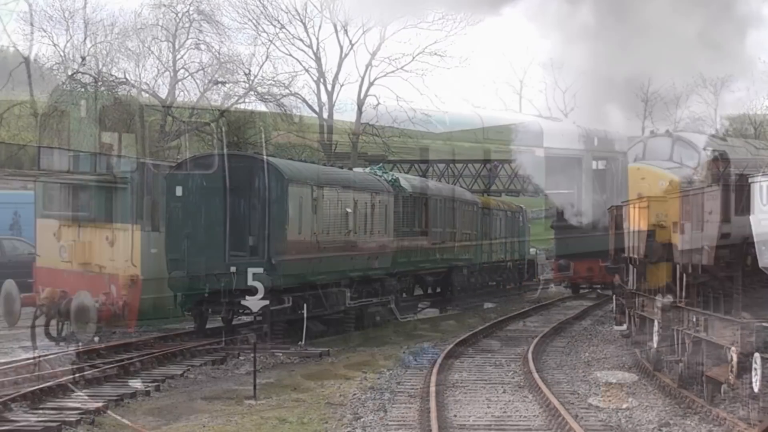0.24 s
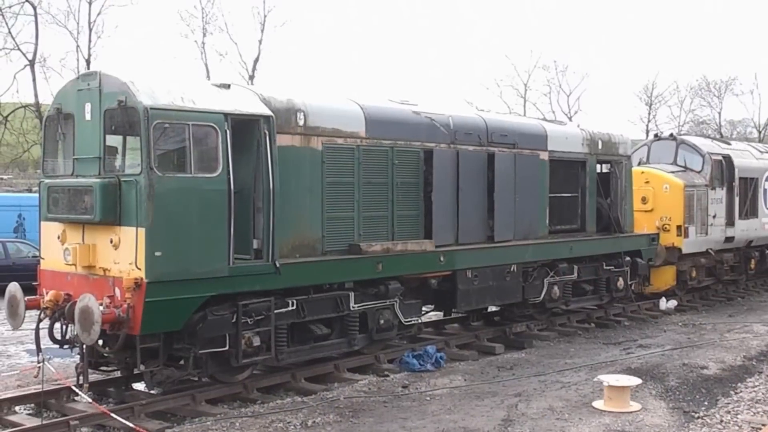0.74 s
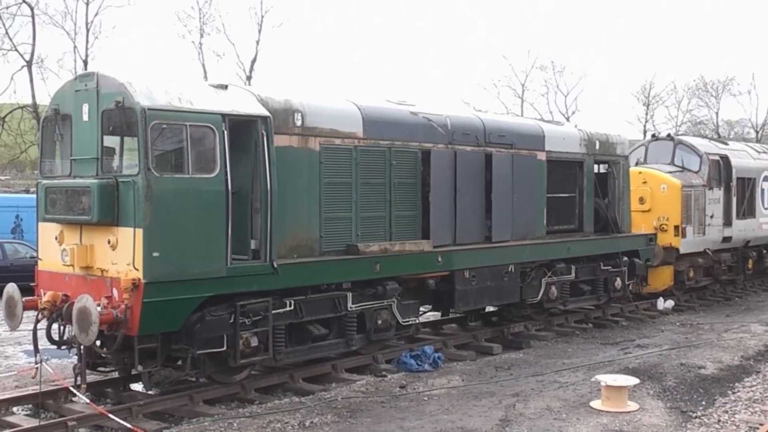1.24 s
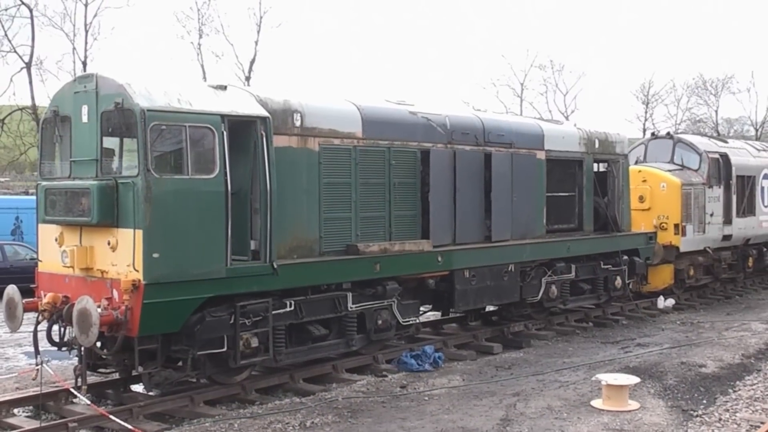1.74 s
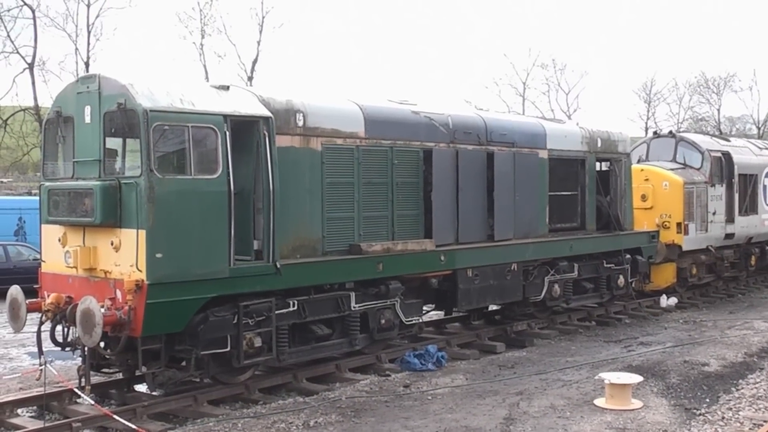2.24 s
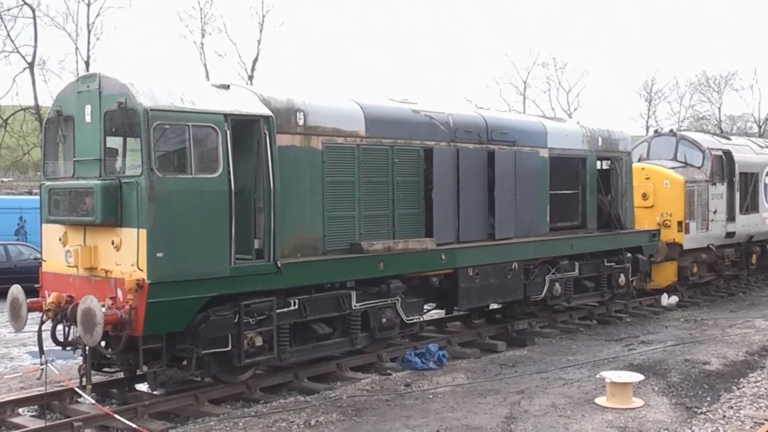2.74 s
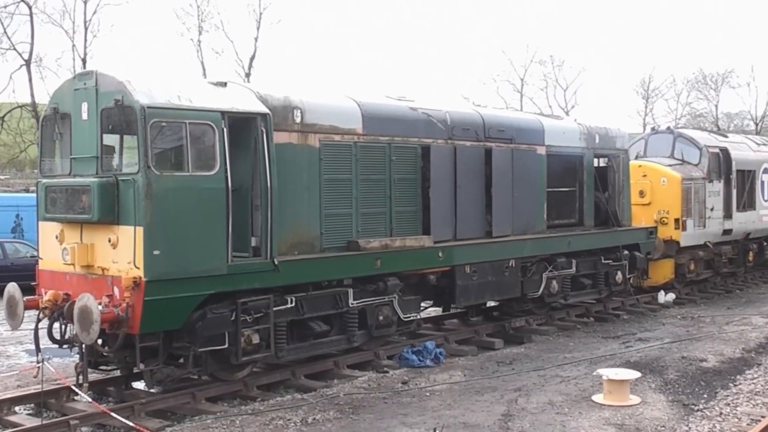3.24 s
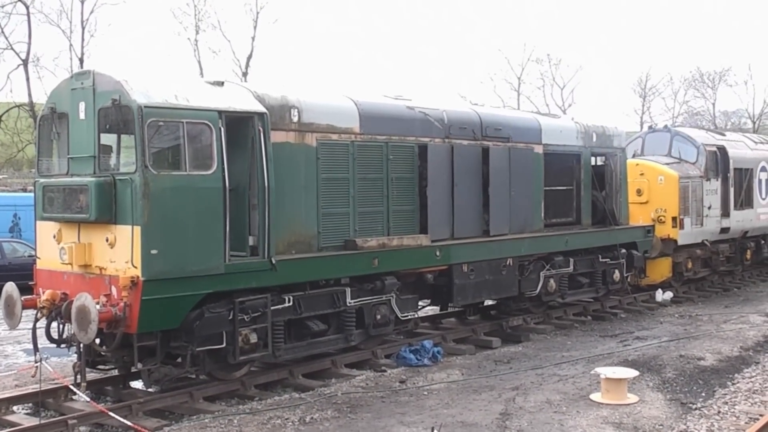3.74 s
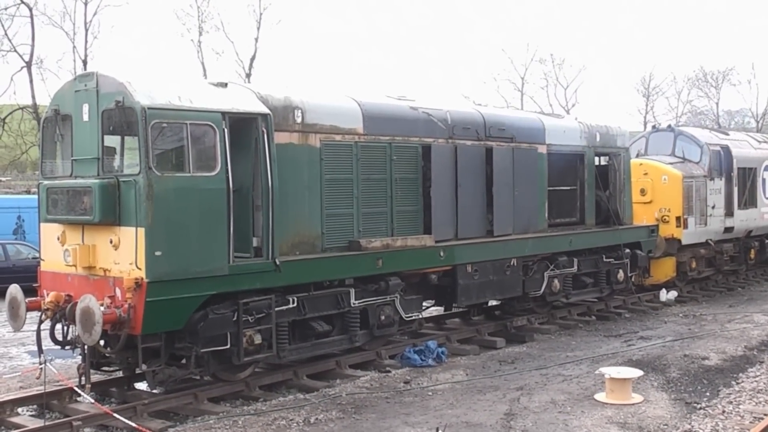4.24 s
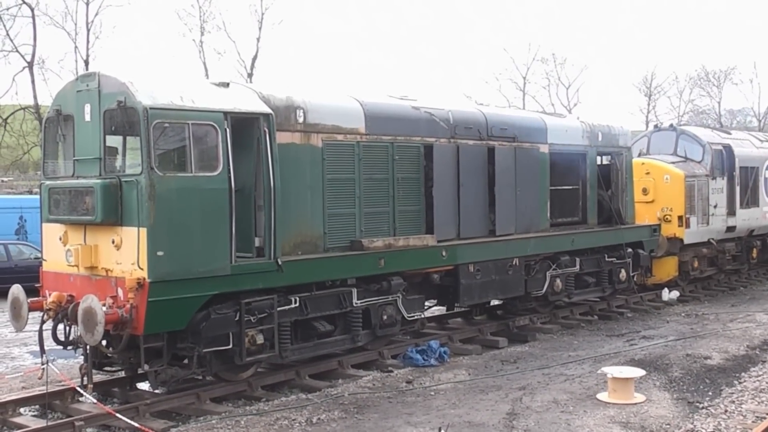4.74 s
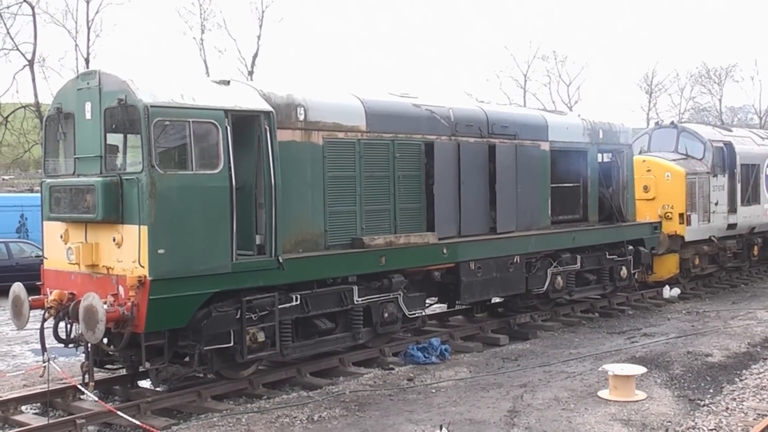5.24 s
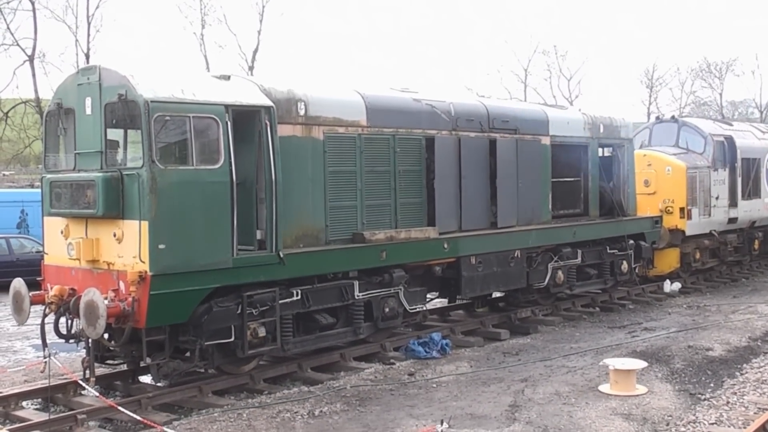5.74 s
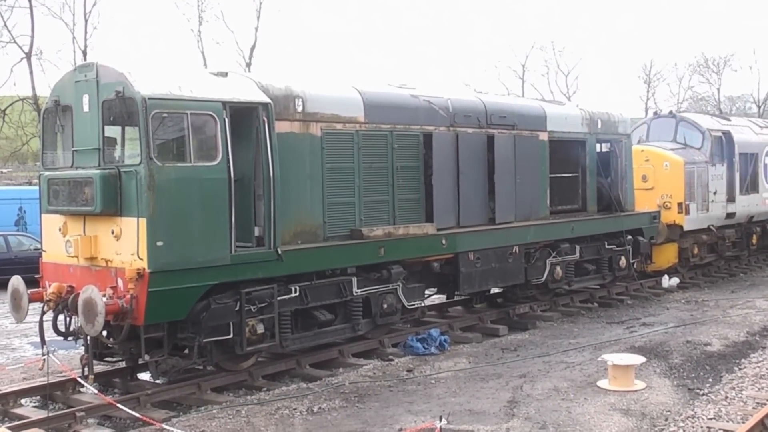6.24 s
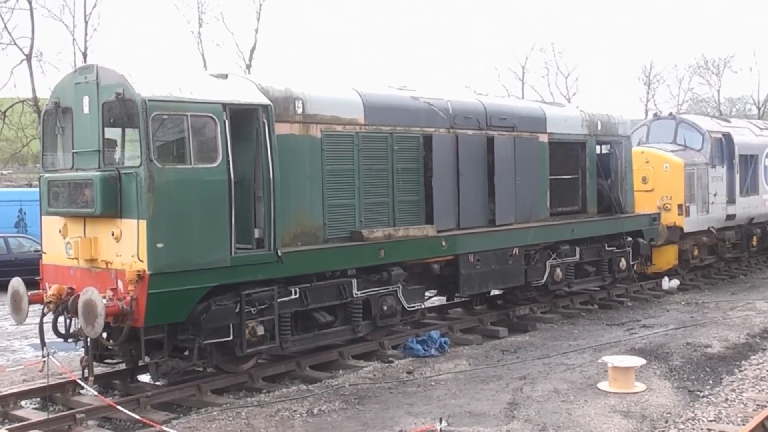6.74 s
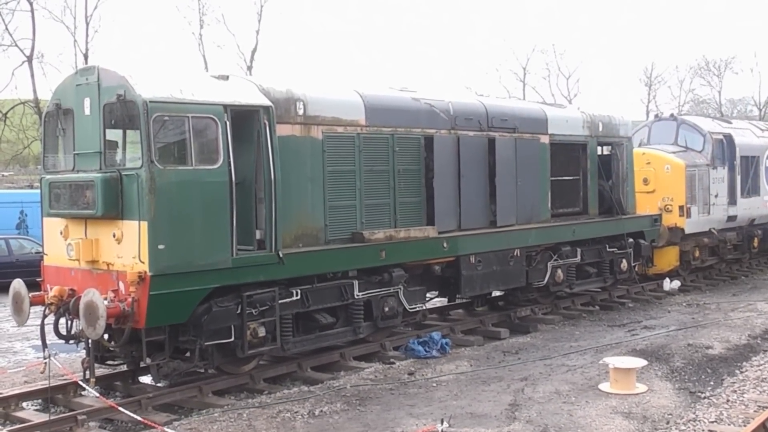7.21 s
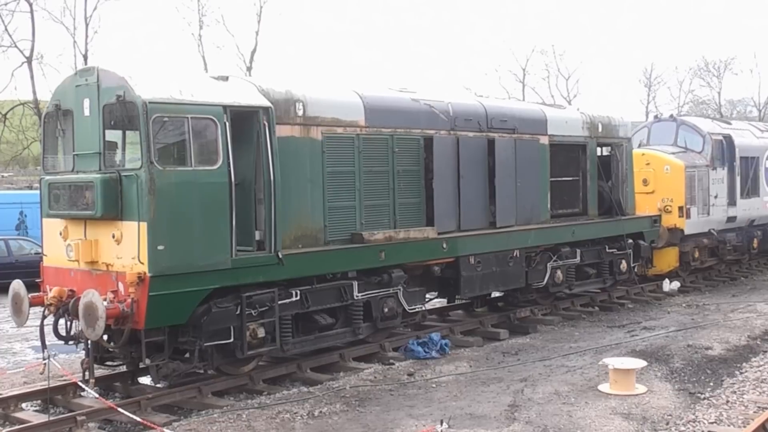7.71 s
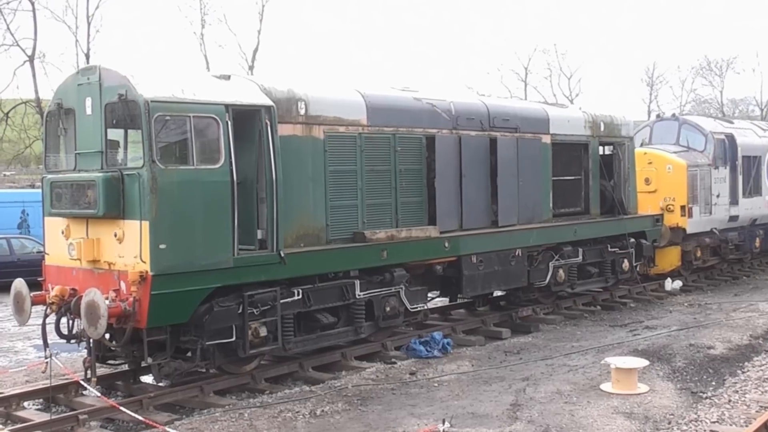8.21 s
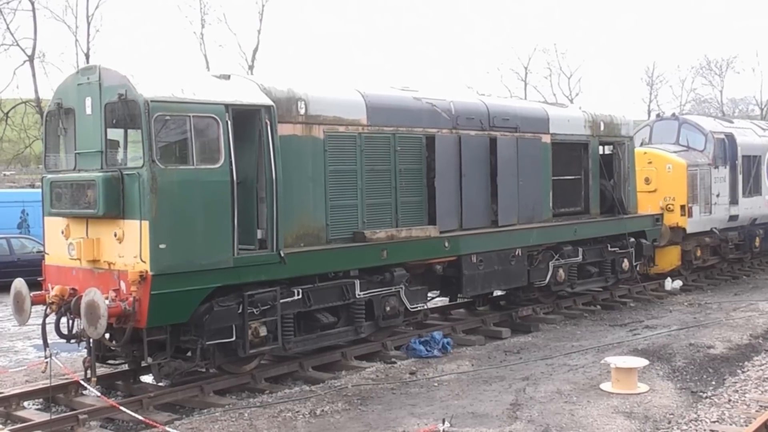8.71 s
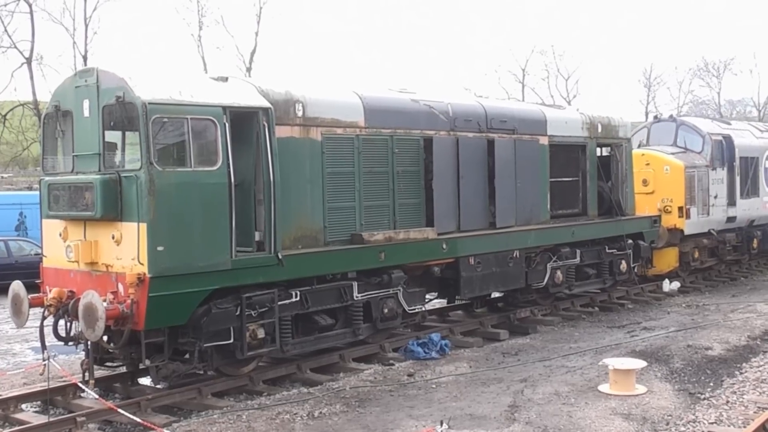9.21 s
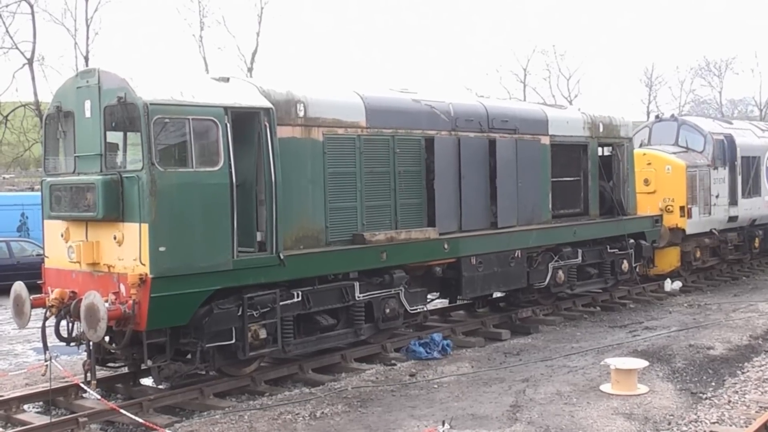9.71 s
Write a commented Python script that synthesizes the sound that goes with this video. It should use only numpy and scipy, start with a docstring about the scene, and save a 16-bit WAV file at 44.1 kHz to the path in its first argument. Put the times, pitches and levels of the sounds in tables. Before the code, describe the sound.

Outdoors in a railway yard, in stereo. At 0 s a broad, slightly lumpy roar of escaping steam is heard; between about 0.2 and 0.6 s it crossfades into a stationary diesel locomotive idling nearby. The engine gives a rough low rumble with a ringing casing, exhaust beats and a light knock about four times a second, over steady gear hum and bright airy hiss. On top is a piercing dry squeal near 3 kHz, broken into nearly fifty tiny chirps a second, with a hoarser whistle just below and scratchy overtones. At first it swells about eight times a second; from roughly 1.4 to 3 s the engine labours, slows very slightly, and the squeal becomes stronger and more even. From 3 to 10 s everything continues steadily, the squeal fluttering and drifting slightly between sides, faintly echoed by wagons and ground, without ending.

```python
"""Railway sounds in stereo: steam roars at the start, then the scene changes, dissolving within about half a
second into a yard with an idling diesel locomotive. Steam, combustion and air are coloured noise; the gears are
steady tones; exhaust beats and a knock follow the crank. Something dry on the diesel, a belt or a bearing,
squeals: one tone in chirps that come round with every engine cycle. From the second second the engine takes up
a load and slows a little; wagons and ground answer the squeal faintly."""
import sys
import numpy as np
from scipy.fft import rfft, irfft, next_fast_len
from scipy.io import wavfile
from scipy.ndimage import map_coordinates

SR = 44100
rng = np.random.default_rng(int(sys.argv[2]) if len(sys.argv) > 2 else 0)


def file_out(sig):
    """Save sig as 16-bit WAV at sys.argv[1]."""
    # one column per channel
    cols = np.atleast_2d(sig).T
    # limit, then scale
    lim = np.clip(cols, -1, 1)
    pcm = np.round(lim * 32767).astype(np.int16)
    wavfile.write(sys.argv[1], SR, pcm)


N = 439677

IDLE_RATE = 3.905  # reference idle speed, four-stroke cycles a second


def amp(db):
    """Decibels to gain."""
    return 10 ** (np.asarray(db) / 20)


def unit(x):
    """Scale so that the mean of the channels has rms 1."""
    return x / np.sqrt(np.mean(np.atleast_2d(x).mean(0) ** 2) + 1e-20)


def along(points, hz):
    """Read a curve of (Hz, value) points on a log frequency axis."""
    f, v = np.transpose(points)
    return np.interp(np.log(hz + 1), np.log(f + 1), v)


def curves(rows):
    """One value per sample for each column after the time in seconds."""
    s, *columns = np.transpose(rows)
    return [np.interp(np.arange(N) / SR, s, column) for column in columns]


def wobble(rate):
    """A smooth random curve through normal draws, rate knots a second."""
    knots = rng.standard_normal(int(N * rate / SR) + 4)
    return map_coordinates(knots, [np.arange(N) * rate / SR])


def ramp(start_s, length_s):
    """A straight rise from 0 to 1."""
    return np.clip((np.arange(N) / SR - start_s) / length_s, 0, 1)


def filtered(x, response):
    """Multiply the spectrum of x by a complex response of frequency."""
    m = next_fast_len(N + SR // 2)
    hz = np.fft.rfftfreq(m, 1 / SR)
    return irfft(rfft(x, m) * response(hz), m)[..., :N]


def resonance(hz, centre_hz, width_hz):
    """Response of one damped mode."""
    return 1j * hz * width_hz / (centre_hz ** 2 - hz ** 2 + 1j * hz * width_hz)


def ports(lean_db, lead):
    """Left and right gains for a level difference in dB and a phase lead of the left in radians."""
    left = amp(lean_db / 2) * np.exp(.5j * lead)
    right = amp(-lean_db / 2) * np.exp(-.5j * lead)
    return np.array([left, right])


def rush(colour):
    """Noise of rms 1 with the given response, as two microphones get it: partly alike, offset in level and phase."""
    # Each row: frequency in Hz, left-right likeness (1 is identical).
    likeness = [(60, 0.99), (120, 1), (240, 1), (480, 0.98), (950, 0.92), (1890, 0.73), (3770, 0.59),
                (7520, 0.68), (15000, 0.58)]
    # Each row: frequency in Hz, left minus right in dB.
    lean_db = [(60, 3), (110, -4), (200, -0.5), (380, -4), (700, -2.5), (1290, -3.5), (2380, -0.5),
               (4400, -3.5), (8120, -2.5), (15000, -3.5)]
    # Each row: frequency in Hz, radians by which the left leads.
    lead_rad = [(0, -0.5), (2670, -0.23), (5680, 0.85), (6630, -0.5), (8010, 1.5), (8530, -1.7), (9300, -1),
                (9730, -2), (10300, -1.6), (10900, -2), (12200, -1.7), (14200, -2), (14600, -1.6),
                (15200, -8.5)]

    def mid_and_side(hz):
        turn = np.arccos(np.clip(along(likeness, hz), 0, 1)) / 2
        return colour(hz) * np.array([np.cos(turn), np.sin(turn)])

    mid, side = filtered(rng.standard_normal((2, N)), mid_and_side)
    pair = np.array([mid + side, mid - side])
    return unit(filtered(pair, lambda hz: ports(along(lean_db, hz), along(lead_rad, hz))))


def diffuse(phase, wet_db, spread_hz):
    """Countless echoes off wagons and ground blur a tone into a narrow band, different at each ear."""
    blur = np.array([wobble(spread_hz) + 1j * wobble(spread_hz) for ear in range(2)])
    return amp(wet_db) * blur * np.exp(1j * phase) / np.sqrt(2)


def since(crank, place):
    """Seconds, at idle speed, from the nearest passage of a place in the engine cycle."""
    return ((crank - place + .5) % 1 - .5) / IDLE_RATE


def burst(crank, place, half_s):
    """A bell-shaped envelope at one place of every cycle; half_s is its standard deviation."""
    return np.exp(-.5 * (since(crank, place) / half_s) ** 2)


def swells(crank, rows, half_s, scatter_db):
    """Envelope of bursts that return every cycle, never quite equally strong."""
    bursts = sum(amp(db) * burst(crank, place, half_s) for place, db in rows)
    return bursts * amp(scatter_db * wobble(8))


def ripple(crank, place, order):
    """A swing that comes order times a cycle, with a crest at the given place."""
    return np.cos(2 * np.pi * order * (crank - place))


def strain(load):
    """The engine labours most halfway through taking up the load."""
    return np.sin(np.pi * load)


def steam_engine():
    """The broad, slightly lumpy roar of escaping steam, its lean to the right partly evened out."""
    # Spectrum of the steam. Each row: frequency in Hz, relative level in dB.
    steam_curve = [(18, -58), (30, -45), (81, -6.5), (171, -7), (328, -3), (485, -8.5), (662, -7),
                   (1140, -16), (1970, -17), (2840, -27.5), (3410, -30), (5030, -32), (15000, -54)]
    roar = rush(lambda hz: amp(along(steam_curve, hz)))
    return amp(-15.0 + 0.76 * wobble(10.0)) * roar * amp([[1], [-1]])


def rushing_air(load):
    """Air hisses as bright noise, with a bounce off a nearby surface rippling its spectrum."""
    # Spectrum of the hiss. Each row: frequency in Hz, relative level in dB.
    air_curve = [(1800, -17), (2400, 2), (2830, 1.5), (2960, 10.5), (3300, 7), (3900, 0), (5500, 0.5),
                 (6500, -2), (8200, -3), (9500, -3), (11200, -7), (13000, -14), (15800, -19)]

    def colour(hz):
        bounce = 1 - .14 * np.exp(-2j * np.pi * hz * .000932)  # arrives 0.932 ms late
        low_cut = hz ** 2 / (hz ** 2 + 1200 ** 2)
        return amp(along(air_curve, hz)) * low_cut * bounce

    hiss = rush(colour)
    level_db = -31 + 0.8 * load + 0.9 * strain(load)
    return amp(level_db + 0.77 * wobble(14)) * hiss


def gear_hum(crank):
    """Firing and gears hum in steady lines at multiples of the cycle rate, swaying in level and phase."""
    # Each entry: multiple of the cycle rate.
    hum_orders = [12, 23, 32, 64, 81, 129, 144, 184]
    # Each entry: rms level in dB of the line of the same position, before its sway.
    hum_levels = [-51, -46, -45.5, -38.5, -38.5, -38.5, -33, -40.5]
    hum = 0
    for order, db in zip(hum_orders, hum_levels):
        phase = 2 * np.pi * order * crank + 0.36 * wobble(5)
        hum = hum + amp(db + wobble(5.1)) * np.sqrt(2) * np.sin(phase)
    return hum


def combustion_roar():
    """Combustion noise comes through the engine body, its level unsteady."""
    # Spectrum of the body. Each row: frequency in Hz, relative level in dB.
    body_curve = [(20, -42), (36, -24), (55, -20), (70, -10.5), (88, -7.5), (108, -9.5), (135, -4.5),
                  (230, -3.5), (330, -4.5), (420, -10), (620, -3.5), (1030, -14), (1450, -13),
                  (1700, -18.5), (2000, -13), (2250, -21.5), (2500, -18.5), (2800, -30), (5000, -120)]
    return amp(-1.5 + 0.69 * wobble(13)) * rush(lambda hz: amp(along(body_curve, hz)))


def casing_ring():
    """Noise excites the damped modes of the engine casing, which add up in power."""
    # Each row: centre in Hz, width in Hz, relative level in dB.
    casing_modes = [(255, 17, 4.5), (310, 19, 0.5), (580, 220, -0.5), (1509, 126, -4), (1873, 92, -8.5)]

    def colour(hz):
        powers = [abs(amp(db) * resonance(hz, centre, width) ** 2) ** 2 for centre, width, db in casing_modes]
        return np.sqrt(sum(powers))

    return amp(-8.5) * rush(colour)


def exhaust(crank, ring_hz):
    """The strongest beats of each cycle ring the silencer for a few swings, leaning to the right."""
    # Each row: place in the cycle from 0 to 1, relative level in dB.
    strongest_beats = [(.322, -3), (.572, 0), (.88, -3)]
    beats = 0
    for place, db in strongest_beats:
        swing = np.cos(2 * np.pi * ring_hz * since(crank, place) + 0.88 * wobble(4))
        beats = beats + amp(db) * burst(crank, place, half_s=0.0053) * swing
    return beats * amp(0.23 * wobble(4.8)) * amp([[-.8], [.8]])


def knock(crank):
    """One mechanical knock a cycle, a short burst of resonant noise."""
    envelope = swells(crank, [(0.352, -2.0)], half_s=0.0028, scatter_db=1.3)
    return envelope * rush(lambda hz: resonance(hz, 520, 650) ** 2)


def diesel(crank, load):
    """The body sounds grow slightly with load and strain, over gear hum and rushing air."""
    sounds = combustion_roar() + casing_ring() + amp(4.4) * exhaust(crank, ring_hz=242) + knock(crank)
    level_db = -22.5 + 0.68 * load + 0.95 * strain(load)
    return amp(level_db) * sounds + gear_hum(crank) + rushing_air(load)


def lower_ring(crank, speed, load):
    """A second, hoarser mode of the rubbing part swells twice a shaft turn and with each firing."""
    pitch_hz = 2635 * (speed / IDLE_RATE) ** .5  # follows the engine speed weakly
    level_db = -37.5 + 0.5 * load + 2.5 * strain(load)
    swing_db = 1.9 * ripple(crank, 0.19, order=4) + 1.5 * ripple(crank, 0.21, order=12)
    whistle = np.sqrt(2) * np.sin(2 * np.pi * np.cumsum(pitch_hz + 11 * wobble(60)) / SR)
    hoarse = rush(lambda hz: resonance(hz, 2613, 140) ** 2)
    return amp(level_db + swing_db) * (whistle + hoarse)


def squeal_phase(crank, speed):
    """The pitch follows the engine speed, bends with every second firing and jitters; returns its phase in radians."""
    idle_hz, follow_power, bend_hz = 3085, .8, 14.8
    pitch_hz = idle_hz * (speed / IDLE_RATE) ** follow_power + bend_hz * ripple(crank, 0.12, order=6)
    return 2 * np.pi * np.cumsum(pitch_hz + 6 * wobble(110)) / SR


def slip_chirps(crank, load):
    """About one slip per firing, each varying in strength and drifting in phase against its neighbours."""
    # Each row: place in the cycle from 0 to 1, half length in seconds under full load, relative level in dB.
    chirp_rows = [(.015, 0.0069, -4), (0.098, 0.0045, -1), (0.22, 0.007, -3.5), (0.25, 0.0084, -3),
                  (0.341, 0.0025, -3.5), (0.422, 0.0087, -6), (0.499, 0.0061, -4.5), (.587, 0.0055, -1),
                  (0.7, 0.0063, -3), (0.756, 0.0065, -3.5), (0.841, 0.0028, -4), (0.928, 0.0092, -2.8)]
    stretch = 1.26 ** (1 - load)  # running free, each chirp holds longer
    chirps = 0
    for place, half_s, db in chirp_rows:
        envelope = amp(db + 0.76 * wobble(4.4)) * burst(crank, place, half_s * stretch)
        chirps = chirps + envelope * np.exp(0.7j * wobble(3))
    # running free, the rubbing also swells once a shaft turn
    swell = ((1 + ripple(crank, 0.13, order=2)) / 2) ** 3.3
    return chirps * amp(6 * (1 - load) * swell)


def squeal(crank, speed, load):
    """Friction drives one mode in chirps; hard rubbing strengthens its overtones and adds a scratch."""
    # Moments of hard rubbing. Each row: place in the cycle from 0 to 1, relative level in dB.
    rasp_rows = [(.002, 3), (.352, -3), (.508, -1), (.617, -4.5), (.852, -6)]
    # Wander between the ears. Each row: time in seconds, left minus right in dB.
    pan_rows = [(0.3, -1.5), (1.7, -3.9), (2.8, 1.4), (4.1, -0.5), (5.5, -1.7), (7.1, -1.3), (8, -3.5),
                (9.2, -1.3), (9.97, -1.5)]
    rasp_db = -16.5
    phase = squeal_phase(crank, speed)
    tone = slip_chirps(crank, load) * np.exp(1j * phase)
    mode = np.outer(ports(0, -0.37), tone) + diffuse(phase, wet_db=-11.5, spread_hz=70)

    rub = swells(crank, rasp_rows, half_s=0.0043, scatter_db=2.9)
    second = amp(-17) * (rub + 0.19) * np.exp(1j * (2 * phase + 1.1 * wobble(70)))
    third = amp(-30) * (rub + .25) * np.exp(1j * (3 * phase + 0.77 * wobble(110)))
    overtones = np.outer(ports(0, -0.15), second + third)
    scratch = amp(rasp_db - 24) * rub * rush(lambda hz: resonance(hz, 8150, 4800) ** 2)

    # stronger under load, but eased while the load is coming on
    level_db = -20 + 4 * load - 1.7 * strain(load)
    voice = amp(level_db) * mode + amp(rasp_db) * overtones
    lean_db, = curves(pan_rows)
    return np.sqrt(2) * voice.real * amp(np.outer([1, -1], lean_db / 2)) + scratch


def scene():
    """The steam engine gives way to the squealing diesel, whose crank and load shape its sounds."""
    # The diesel slows a little under load. Each row: time in seconds, four-stroke cycles a second.
    speed_rows = [(0, 3.948), (2, 3.948), (3.1, 3.912), (10, 3.9)]
    speed, = curves(speed_rows)
    crank = .915 + np.cumsum(speed) / SR  # in cycles, from the place where it starts
    load = ramp(start_s=1.37, length_s=1.64)
    steam_gain = 1 - ramp(start_s=0.31, length_s=.28)
    diesel_gain = np.maximum(ramp(start_s=0.16, length_s=0.29), amp(-30))  # rises from a faint level
    locomotive = diesel(crank, load) + lower_ring(crank, speed, load) + squeal(crank, speed, load)
    return steam_gain * steam_engine() + diesel_gain * locomotive


def record(dry):
    """The recorder keeps nothing from its band limit upwards."""
    return filtered(dry, lambda hz: hz < 15800)


dry = scene()
out = record(dry)
file_out(out)
```